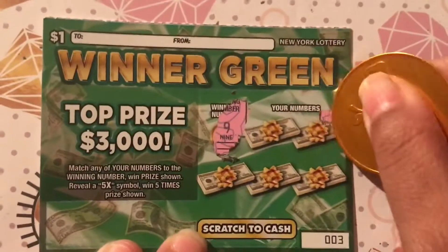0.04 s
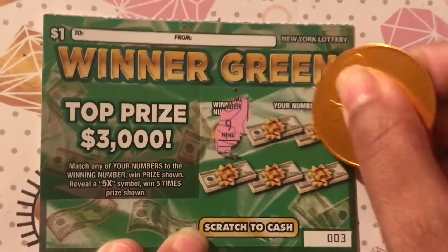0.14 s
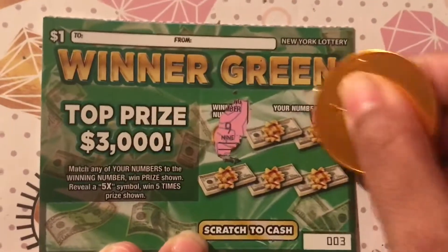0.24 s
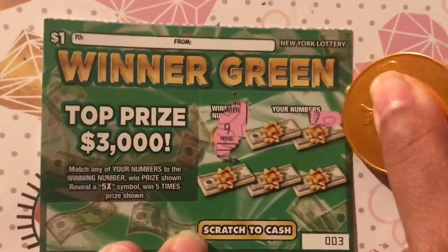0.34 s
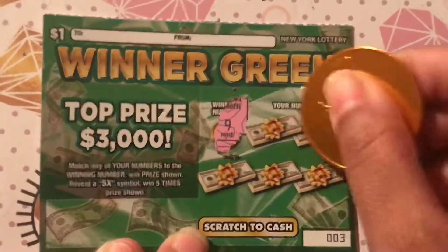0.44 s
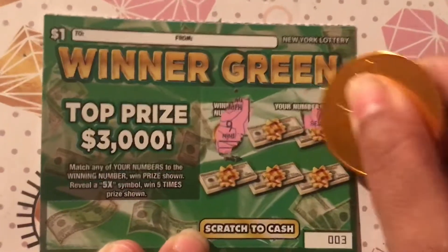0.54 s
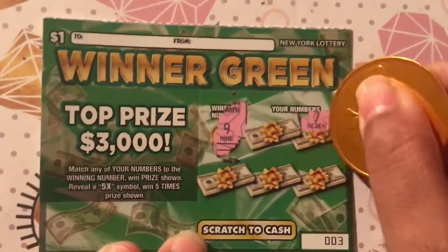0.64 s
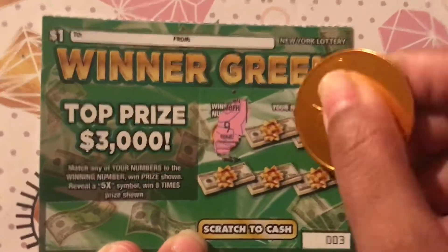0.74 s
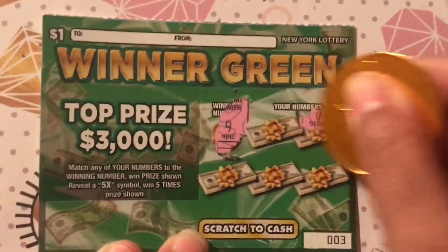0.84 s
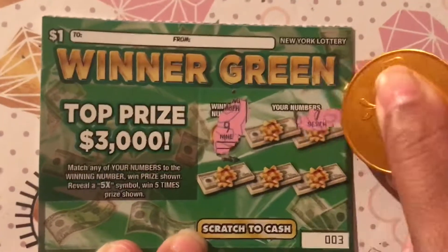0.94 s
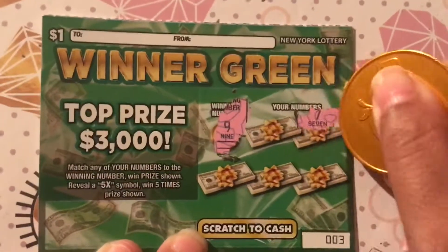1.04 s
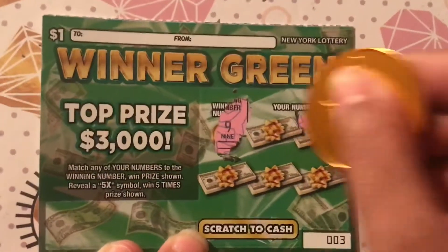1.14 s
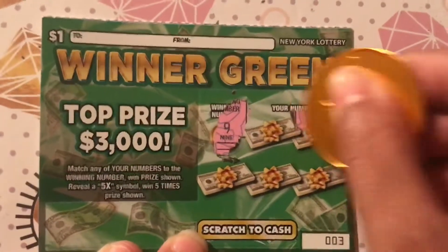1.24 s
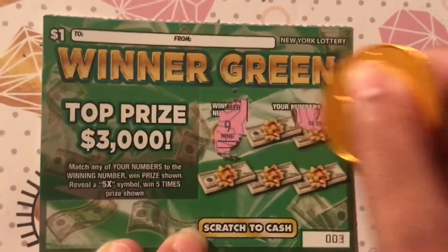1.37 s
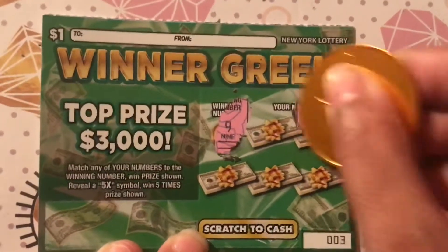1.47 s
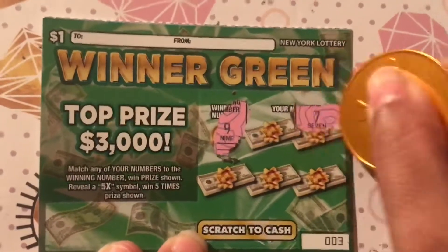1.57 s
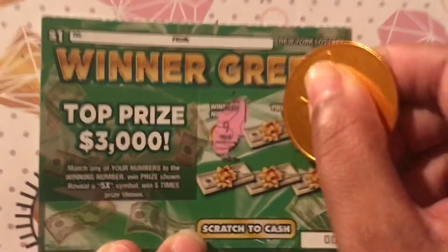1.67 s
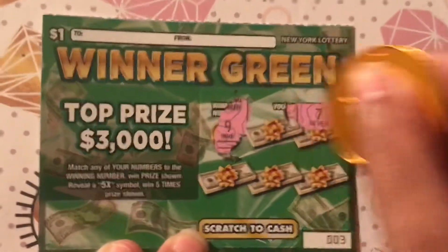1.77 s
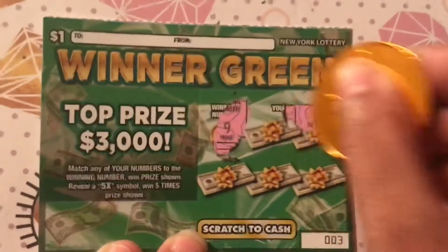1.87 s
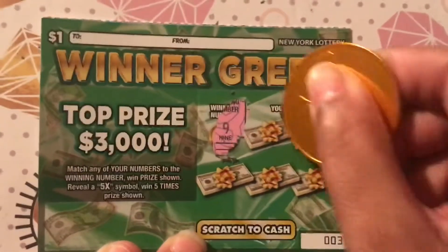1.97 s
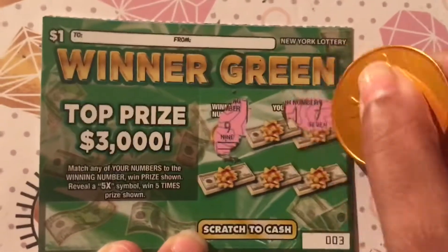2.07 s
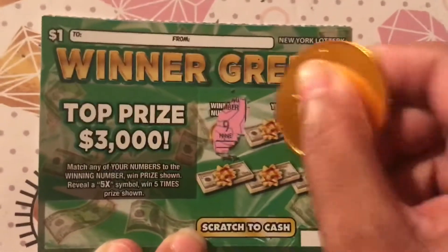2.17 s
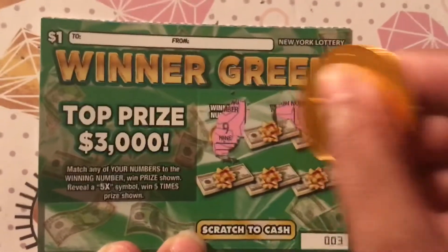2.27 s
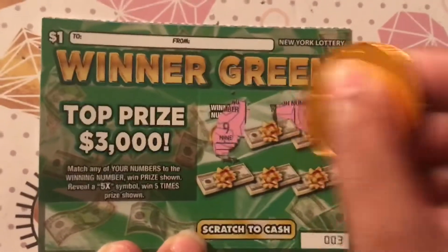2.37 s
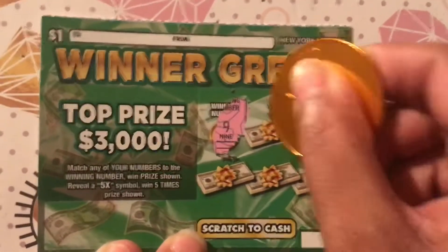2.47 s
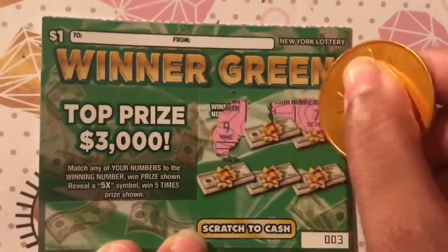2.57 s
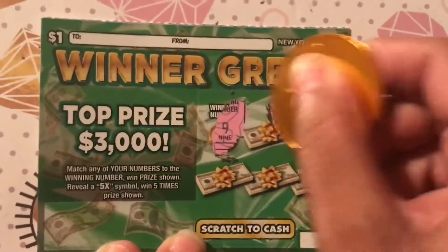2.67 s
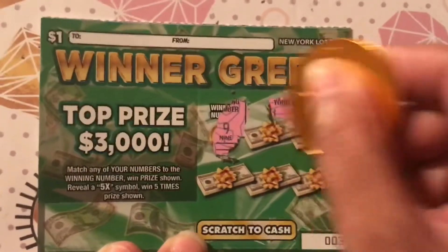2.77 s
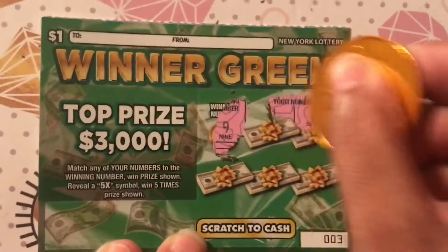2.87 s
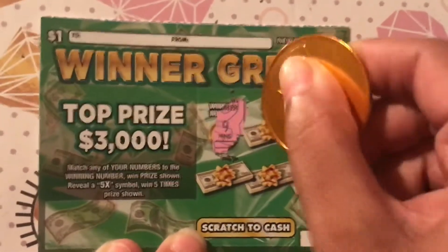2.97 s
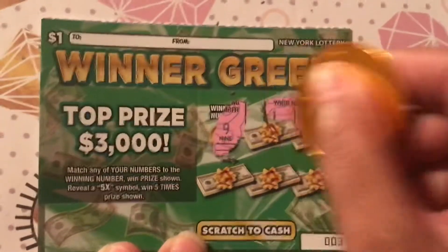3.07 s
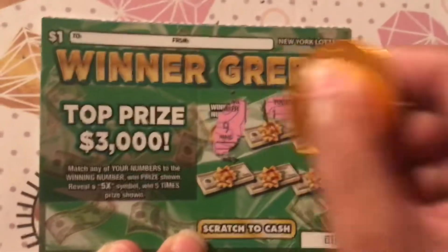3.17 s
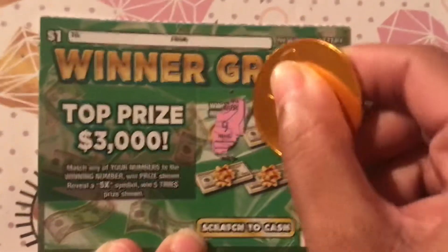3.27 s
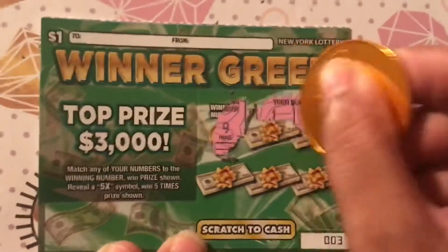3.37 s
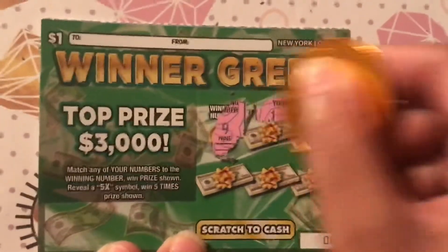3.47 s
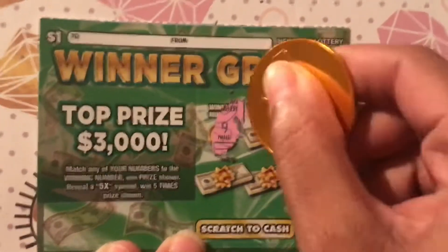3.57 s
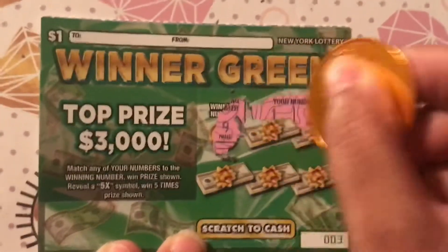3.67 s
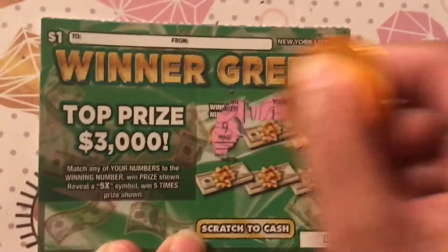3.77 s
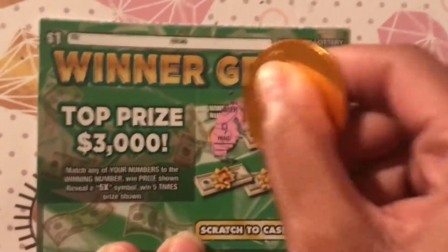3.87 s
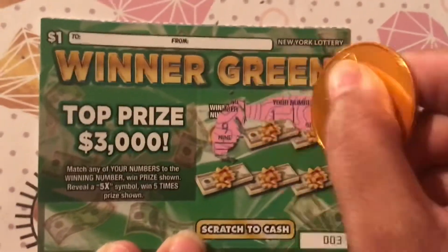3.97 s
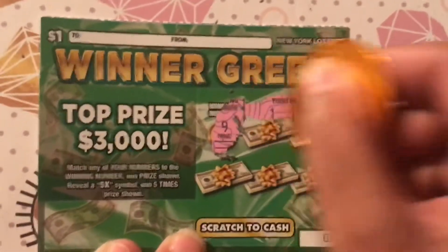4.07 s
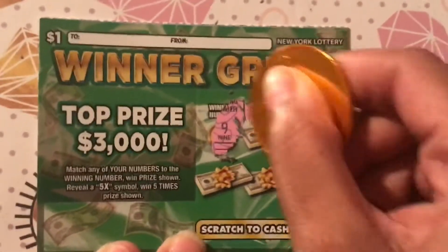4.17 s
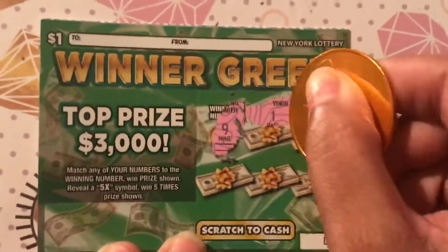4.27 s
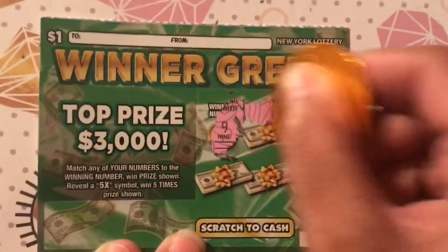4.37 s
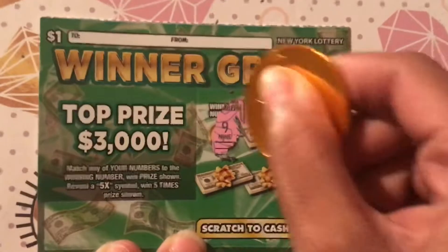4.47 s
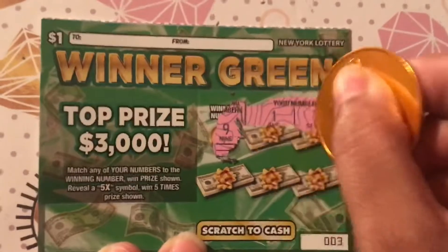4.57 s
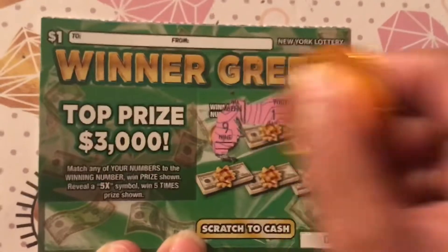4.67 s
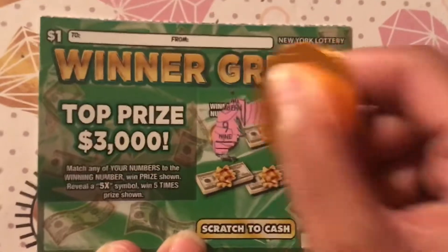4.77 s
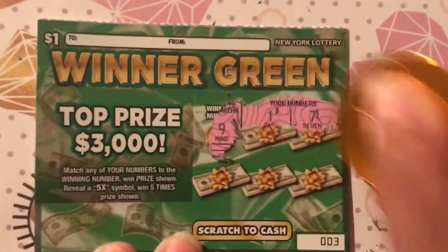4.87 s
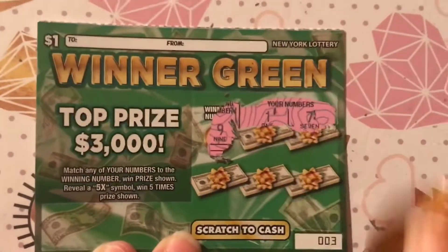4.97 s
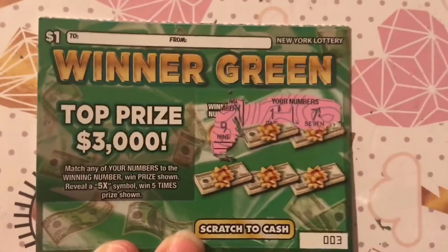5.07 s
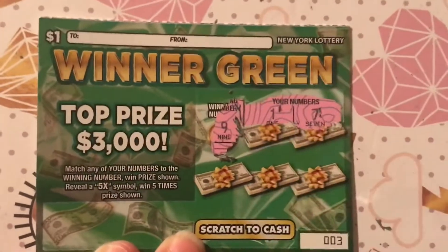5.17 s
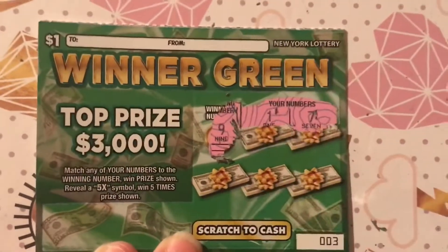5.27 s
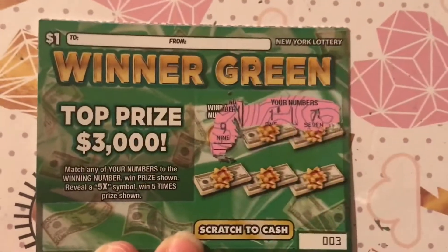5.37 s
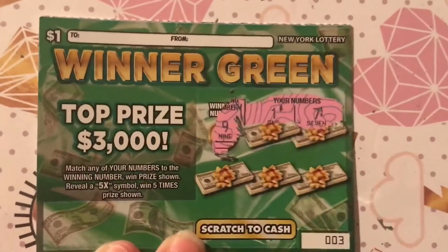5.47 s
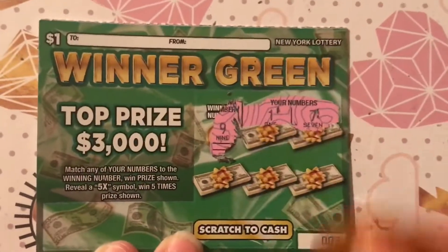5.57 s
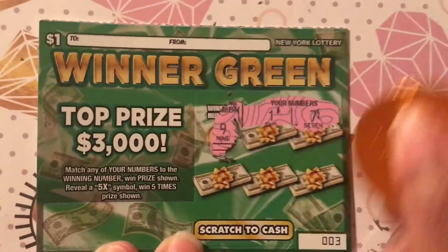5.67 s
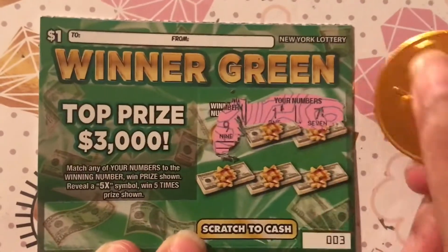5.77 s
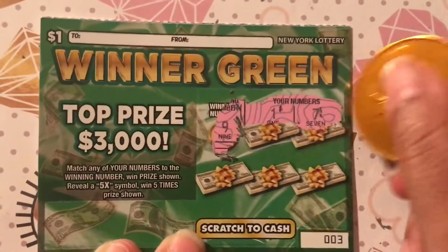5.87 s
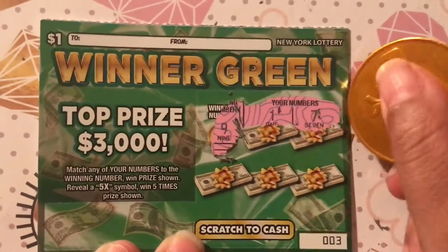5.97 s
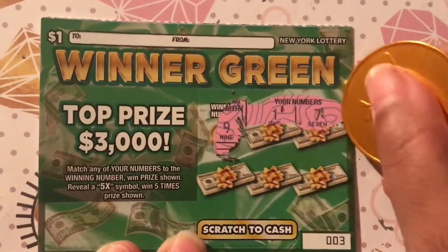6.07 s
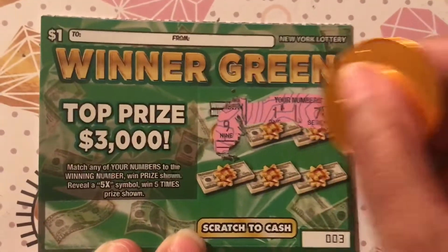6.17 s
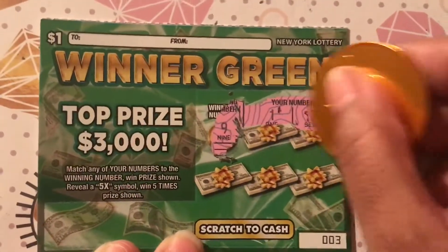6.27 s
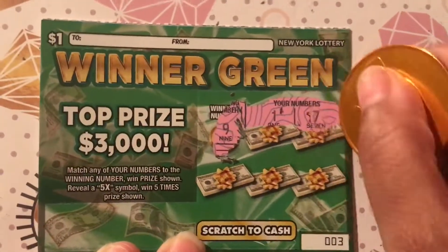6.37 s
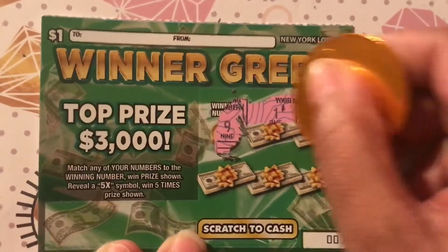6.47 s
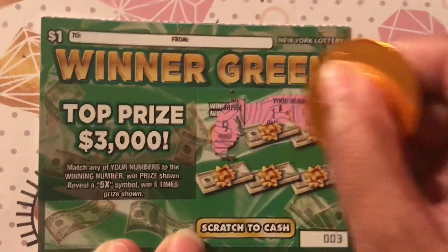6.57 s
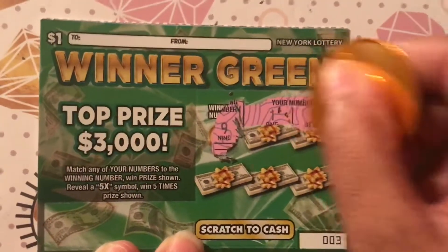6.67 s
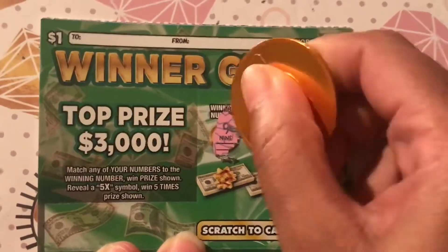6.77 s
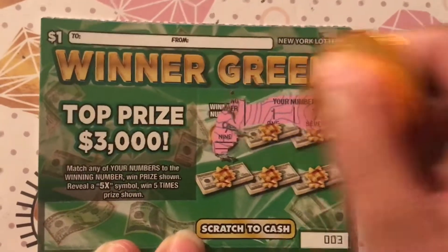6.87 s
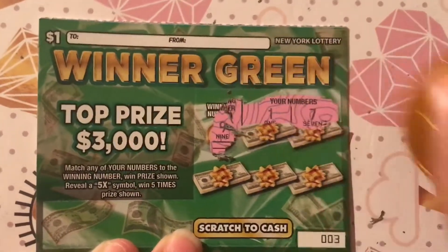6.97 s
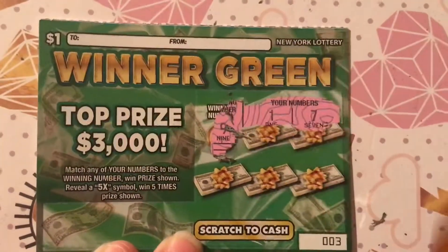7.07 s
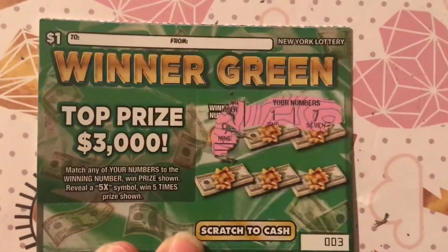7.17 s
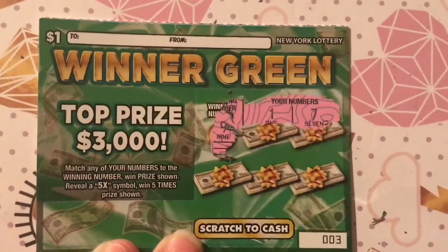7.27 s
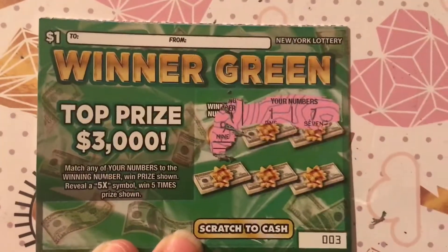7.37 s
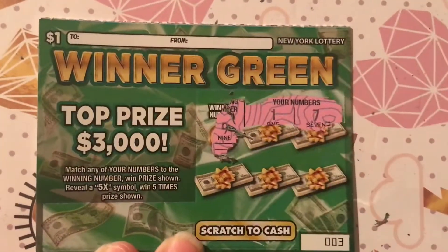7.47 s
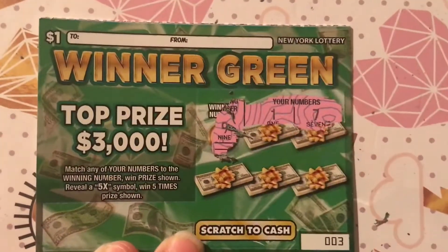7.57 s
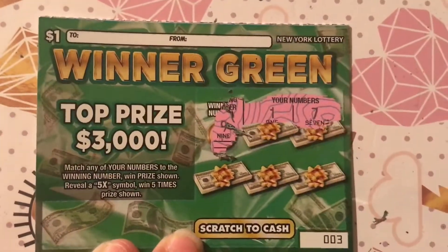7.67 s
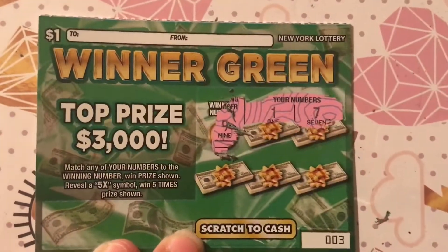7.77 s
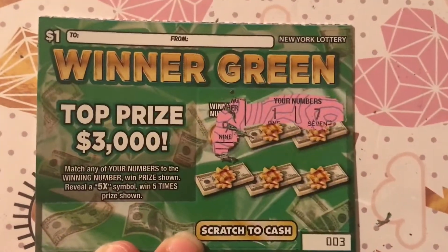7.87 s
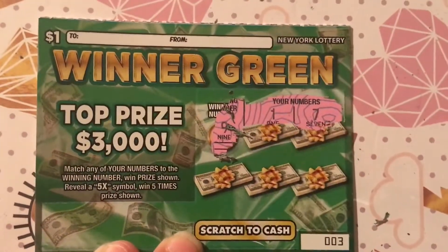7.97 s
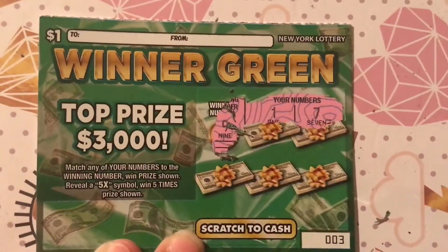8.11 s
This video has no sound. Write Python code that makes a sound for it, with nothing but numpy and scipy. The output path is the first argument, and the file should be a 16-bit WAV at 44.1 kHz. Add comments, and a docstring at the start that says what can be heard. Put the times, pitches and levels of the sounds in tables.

```python
"""In a quiet room, close by, a coin scrapes the coating off a paper ticket lying on a table.
Hard pushes alternate with light returns: tiny slips of the edge make the table top rasp at its own pitches,
while grains of flaking coating hiss and make the coin ring. Now and then the edge snags with a crackle
and a knock, and the hand bumps the table, which sways with a low thud. One flick bends the card until it
snaps free; in the pauses shaped noise brushes softly over the paper, above a faint room tone."""
import sys
import numpy as np
from scipy import signal
from scipy.fft import rfft, irfft, next_fast_len
from scipy.io import wavfile

SR = 44100
rng = np.random.default_rng(int(sys.argv[2]) if len(sys.argv) > 2 else 0)


def generate_wav(signal):
    """Clip the signal to [-1, 1] and save it as 16-bit WAV at the path in sys.argv[1]."""
    frames = np.transpose(np.atleast_2d(signal))
    scaled = np.clip(frames, -1, 1) * 32767
    pcm = np.round(scaled).astype(np.int16)
    wavfile.write(sys.argv[1], SR, pcm)


N = 358974

# The edge catches and breaks free:
# (time [s], crackle level [dB], level of the knock in the table [dB], length of the crackle [s])
SNAGS = [(0.053, -43.5, -43, 0.0075), (.086, -53, -38, 0.0093), (0.203, -41.5, -45.5, .01),
         (0.229, -42, -40.5, 0.011), (.367, -39, -35, 0.0093), (.666, -40.5, -35, 0.0032),
         (1.01, -41, -45.5, 0.0014), (1.089, -42, -30.5, 0.018), (1.199, -45, -54, 0.0018),
         (1.238, -43.5, -46, .015), (1.332, -45, -33, 0.0045), (1.552, -52, -37, .0024),
         (1.598, -42, -28.5, 0.0033), (2.108, -39, -30.5, 0.007), (2.358, -37.5, -32, .004),
         (2.876, -48, -34, 0.0056), (3.151, -41, -47, 0.0048), (3.441, -43, -55, 0.011),
         (3.455, -34.5, -32.5, .005), (3.748, -35.5, -46, 0.0055), (3.756, -30.5, -49, 0.0044),
         (4.067, -46, -39, .004), (4.355, -44, -37.5, 0.0092), (4.368, -42, -48, 0.0036),
         (4.78, -65, -52, .005), (6.066, -53, -56, 0.0011), (6.841, -35.5, -40, 0.012),
         (6.856, -42, -50, 0.0038)]
# The hand bumps the table: (time [s], level [dB], change of the scraping just after it [dB])
BUMPS = [(.076, -37, 5), (.26, -37.5, -12), (0.392, -41, -4.5), (.67, -35.5, -12.5), (1.099, -39, 5),
         (1.604, -35, -1), (2.115, -39, -6.5), (2.367, -38, -3.5), (2.88, -33, -6), (3.164, -37.5, -3.5),
         (3.464, -29.5, -10.5), (3.762, -26.5, -1), (4.011, -38, -1.5), (4.307, -33, -2),
         (6.295, -42.5, -2), (6.865, -47, 4)]


def from_db(db):
    """Turn decibels into a gain."""
    return 10 ** (np.asarray(db) / 20)


def rms_one(x):
    """Scale to unit power."""
    return x / np.sqrt(np.mean(x ** 2) + 1e-20)


def in_time(rows):
    """Join (time, value) rows by straight lines."""
    return np.interp(np.arange(N) / SR, *np.transpose(rows))


def colour(x, spectrum):
    """Shape by a smooth spectrum, keeping the power of a white input."""
    hz, db = np.transpose(spectrum)
    size = next_fast_len(N)
    bins_hz = np.maximum(np.fft.rfftfreq(size, 1 / SR), 1)
    gain = rms_one(from_db(np.interp(np.log(bins_hz), np.log(hz), db)))
    return irfft(rfft(x, size) * gain, size)[:N]


def band(x, low_hz, high_hz):
    """Keep one band of x, without delaying it."""
    sos = signal.butter(4, [low_hz, min(high_hz, SR * .45)], "band", fs=SR, output="sos")
    return signal.sosfiltfilt(sos, x)


def drift(rate):
    """Random curve of spread 1 that takes a new direction about rate times a second."""
    knots = np.arange(N) / SR * rate
    return rms_one(np.interp(knots, np.arange(N), rng.standard_normal(N)))


def resonate(x, hz, width_hz):
    """Ring at one pitch, with gain 1 at the top of the resonance."""
    r = np.exp(-np.pi * width_hz / SR)
    top = np.array([1, 0, -1]) * (1 - r * r) / 2
    bottom = [1, -2 * r * np.cos(2 * np.pi * hz / SR), r * r]
    return signal.lfilter(top, bottom, x + 1e-18)


def slips(per_s, spread_db):
    """Tiny random breaks of contact, of uneven size and either sign; unit power."""
    sizes = from_db(spread_db * np.minimum(rng.exponential(1, N), 4))
    signs = rng.choice([-1, 1], N)
    happens = rng.random(N) < per_s / SR
    return rms_one(sizes * signs * happens)


def arch(phase, crest):
    """Curve that rises from 0 to 1 at the crest and falls back to 0."""
    warped = np.interp(phase, [0, np.clip(crest, .1, .9), 1], [0, .5, 1])
    return np.sin(np.pi * warped).clip(0)


def hand(overrun_s=.006, rasp_power=0.75, swell_power=1.3, release_power=2.4, return_power=1.77, pace_power=0.26):
    """Speed up and slow down each stroke; give speed, pace, pushing (0 or 1), rasp and hiss gains, tone gains."""
    # strokes, push and return in turn:
    # (start [s], end [s], rasp level [dB], hiss level [dB], crest of the pressure [share of the stroke])
    strokes = [(.03, .115, -43.5, -57.5, 0.49), (.18, .275, -44, -50, 0.36), (.31, .41, -36.5, -45.5, .73),
               (.432, .565, -43.5, -52.5, 0.26), (.609, .7, -37.5, -51, 0.89),
               (.74, .825, -51.5, -62, 0.44), (1.047, 1.135, -42.5, -50, 0.59),
               (1.168, 1.275, -45.5, -56.5, 0.58), (1.285, 1.395, -38.5, -42, 0.5),
               (1.42, 1.51, -44.5, -54.5, .48), (1.528, 1.635, -35, -47.5, 0.77),
               (1.665, 1.765, -45.5, -52, 0.35), (1.778, 1.895, -37.5, -41, 0.61),
               (1.925, 2.025, -46.5, -55.5, .4), (2.047, 2.145, -36.5, -44, 0.81),
               (2.183, 2.285, -43.5, -55, 0.27), (2.3, 2.39, -38.5, -47.5, 0.56),
               (2.42, 2.525, -45.5, -58.5, 0.65), (2.545, 2.66, -39.5, -43, 0.55),
               (2.695, 2.787, -46, -58, .52), (2.81, 2.9, -38, -45.5, 0.82),
               (2.968, 3.07, -45.5, -51, 0.38), (3.09, 3.195, -38.5, -45.5, 0.73),
               (3.238, 3.345, -45, -50.5, .46), (3.39, 3.48, -35, -47, 0.89),
               (3.55, 3.645, -45.5, -51, 0.42), (3.688, 3.785, -38.5, -46.5, .67),
               (3.83, 3.938, -45, -51, 0.57), (3.992, 4.085, -31, -44, 0.67),
               (4.13, 4.225, -43, -43.5, 0.48), (4.295, 4.395, -35.5, -50.5, 0.44),
               (4.41, 4.535, -44, -49, 0.47), (4.588, 4.695, -34.5, -44.5, 0.55),
               (4.708, 4.755, -47.5, -58, 0.21), (6.075, 6.175, -52, -62.5, 0.73),
               (6.215, 6.3, -50.5, -57, 0.33), (6.342, 6.455, -44.5, -53.5, 0.57),
               (6.485, 6.575, -53.5, -58, 0.49), (6.598, 6.725, -44.5, -48.5, 0.74),
               (6.75, 6.87, -49.5, -52.5, 0.49)]
    # a push bites at once and rasps deep; a return is light and even:
    # (rise of the rasp over a stroke that crests midway [dB], low rasp [dB], top hiss [dB], relative pace)
    push_style = (-13.5, -1, -3.0, 1.0)
    return_style = (2, -5.5, 0, 1.19)
    # how briskly the hand works: (time [s], pace relative to usual)
    briskness = [(.4, 1.27), (1.2, 0.88), (1.8, 0.98), (2.15, 1.2), (2.6, 0.95), (3.6, 1.2), (4.1, 0.91),
                 (4.65, 1.25), (6.1, 0.84), (6.6, 1.14)]
    # the low rasp, fuller in the last burst: (time [s], level [dB])
    low_rasp = [(.1, 1), (.5, -1), (1.7, -2), (3.6, 1.5), (4.6, -2), (6.1, 7.5), (6.8, 4)]
    # the top hiss, dull on the first strokes of a fresh grip: (time [s], level [dB])
    top_hiss = [(.07, -32), (.3, -18), (.8, -10), (1.5, -7), (2.6, -4.5), (4.0, -4), (4.7, -4.5), (6.1, -8),
                (6.6, 0.5)]
    usual_stroke_s = 0.12
    # the rasp leans towards the crest of the pressure (dB of rise per share of the stroke)
    rasp_lean_db = 41
    # the harder the rasp against the hiss, the more the hiss spreads to its low and top ends (dB per dB)
    low_hiss_follows, top_hiss_follows = 0.47, 0.38

    speed, pace, pushing, rasp, hiss = np.zeros((5, N))
    bass_db, low_db, top_db = in_time(low_rasp), np.zeros(N), in_time(top_hiss)
    for k, (start, end, rasp_db, hiss_db, crest) in enumerate(strokes):
        span = np.arange(int((start - overrun_s) * SR), int((end + overrun_s) * SR))
        phase = np.linspace(0, 1, len(span))
        push = k % 2 == 0
        rise_db, stroke_bass_db, stroke_top_db, haste = push_style if push else return_style
        rise_db = rise_db + rasp_lean_db * (crest - .5)
        speed[span] = arch(phase, .39)
        pushing[span] = push
        # the coin always covers about the same distance, so shorter strokes are faster
        pace[span] = haste * min((usual_stroke_s / (end - start)) ** pace_power, 1.15)
        bass_db[span] += stroke_bass_db
        low_db[span] += low_hiss_follows * (rasp_db - hiss_db)
        top_db[span] += stroke_top_db + top_hiss_follows * (rasp_db - hiss_db)
        # friction levels off once the coin is under way
        friction = np.tanh(3.54 * speed[span] ** 2) ** rasp_power
        rasp[span] += from_db(rasp_db) * rms_one(friction * from_db(rise_db * phase))
        # a push digs in gradually and lets go quickly
        power = np.where(phase < crest, swell_power, release_power) if push else return_power
        hiss[span] += from_db(hiss_db) * rms_one(arch(phase, crest) ** power)
    tones = from_db(np.array([bass_db, low_db, top_db]))
    return speed, pace * in_time(briskness), pushing, rasp, hiss, tones


def after_bumps(hold_s=0.054, grab_s=0.0017):
    """Gain of the scraping, which turns softer or louder for a moment after each bump."""
    t, db = np.arange(SR // 10) / SR, np.zeros(N)
    for s, level_db, change_db in BUMPS:
        shape = (1 - np.exp(-t / grab_s)) / (1 + (t / hold_s) ** 6)
        db[round(s * SR) + np.arange(len(t))] += change_db * shape
    return from_db(db)


def judder(speed, slow_hz=330, fast_hz=930, unsteady=.16):
    """The edge sticks and slips half regularly, faster as the coin speeds up."""
    wobble = np.exp(unsteady * drift(450) + .1 * drift(7))
    hz = (slow_hz + (fast_hz - slow_hz) * speed ** 2) * wobble
    wave = np.sqrt(2) * np.sin(2 * np.pi * np.cumsum(hz) / SR)
    return wave * from_db(0.57 * drift(160))


def knocks(ring_s=0.01):
    """Each snag gives the table one sharp tug, whose energy rings out over a few milliseconds."""
    force = np.zeros(N)
    for s, crackle_db, knock_db, length in SNAGS:
        force[round((s + .001) * SR)] = from_db(knock_db) * np.sqrt(SR * ring_s)
    return signal.sosfilt(signal.butter(2, 1500, fs=SR, output="sos"), force)


def table_top(speed, pace, pushing, rasp, bass, slow_hz=380, fast_hz=1200, judder_db=-18, bass_edge_hz=450):
    """Slips shake the table's modes; a faster coin crosses the grain faster and reaches higher ones."""
    # modes of the table top under the card, rung no narrower than a twelfth of their pitch:
    # (pitch [Hz], width [Hz], relative level [dB])
    table_modes = [(57.6, 8.3, -6), (109.4, 25, -8.5), (175.5, 43, -5.5), (242.4, 42, -2), (390, 42, -4.5),
                   (522.3, 48.7, 0), (575, 61.5, 1), (693, 19, 0.5), (839, 18, -3), (944, 33, -3.5),
                   (1090, 114, -7.5), (1317, 62, -14), (1550, 290, -19), (1830, 250, -16.5)]
    friction = slips(4000, spread_db=2.0) * from_db(1.0 * drift(110))
    force = rasp * (friction + from_db(judder_db) * pushing * judder(speed))
    tugs = knocks()
    reach_hz = slow_hz + (fast_hz - slow_hz) * (pace * speed) ** 2
    out, power = 0, 0
    for k, (hz, width_hz, db) in enumerate(table_modes):
        # less force gets through above the reach of the coin
        drive = (fast_hz / reach_hz) ** .45 / np.sqrt(1 + (hz / reach_hz) ** 8)
        weight = bass if hz < bass_edge_hz else 1
        ring = resonate(force * drive * weight + tugs, hz, max(width_hz, hz / 12))
        # neighbouring modes take opposite signs
        out = out + (-1) ** k * from_db(db) * ring
        power += from_db(db) ** 2 * np.pi * width_hz / SR
    return out / np.sqrt(power)


def lingering(hiss, level_db=-27, fade_s=0.037):
    """Loose flakes keep crackling faintly under the resting coin after a stroke."""
    r = np.exp(-1 / (fade_s * SR))
    return hiss + from_db(level_db) * signal.lfilter([1 - r], [1, -r], hiss)


def snags(fade_s=0.00088):
    """Gain of the short burst of flakes that each snag tears off: it holds for its length, then fades."""
    crackle, t = np.zeros(N), np.arange(SR // 20) / SR
    for s, crackle_db, knock_db, length in SNAGS:
        burst = np.exp(-np.maximum(t - length, 0) / fade_s)
        crackle[round(s * SR) + np.arange(len(t))] += from_db(crackle_db) * burst
    return crackle


def coin_ring(edge):
    """The coin, damped by the fingers, rings at its own pitches when grains strike its edge."""
    # modes of the held coin: (pitch [Hz], width [Hz], relative level [dB])
    coin_modes = [(2550, 59, -3.5), (3220, 290, -5), (7080, 220, -1), (6780, 230, -1), (14150, 380, -16),
                  (14100, 450, -11)]
    # its strongest ring: (pitch [Hz], width [Hz])
    main_ring = [(9590, 270), (9810, 250)]
    main_ring_db = 6
    # two modes that depend on how loose the grip is: (pitch [Hz], width [Hz])
    loose_modes = [(4110, 280), (4330, 280)]
    # how freely those two ring: (time [s], level [dB])
    looseness = [(0, 5), (0.8, 4), (1.3, 2), (1.7, -1.5), (2.3, -18), (4.7, -3.5), (6.1, 7.5), (6.45, 2.5),
                 (6.9, -24)]
    ring = 0
    for hz, width_hz, db in coin_modes:
        ring = ring + from_db(db + 0.64 * drift(5.9)) * resonate(edge, hz, width_hz)
    for hz, width_hz in main_ring:
        ring = ring + from_db(main_ring_db + 1.8 * drift(15)) * resonate(edge, hz, width_hz)
    loose = band(edge, low_hz=3850, high_hz=4650) * from_db(in_time(looseness))
    for hz, width_hz in loose_modes:
        ring = ring + resonate(loose, hz, width_hz)
    return ring


def coating(pushing, hiss, low, top, crackle, card_db=-2, light_ring_db=-3, wander_db=2.5, snag_top_db=-4.0):
    """Flakes break off in dense grains; they hiss directly and ring the coin, more so under pressure."""
    # colour of the flaking coating: (frequency [Hz], relative level per Hz [dB])
    hiss_colour = [(500, 3), (1100, 11.5), (1700, 0), (2800, -0.5), (3700, -0.5), (4700, -3), (5600, -0.5),
                   (7400, -0.5), (8900, -7.5), (10400, -12), (11400, 3.5), (12700, 1), (14300, 9),
                   (16000, 2.5)]
    force = hiss * from_db(2.1 * drift(260) + 1.2 * drift(55)) + crackle
    edge = slips(13000, spread_db=3.0) * force * from_db(light_ring_db * (1 - pushing))
    card = colour(slips(13000, spread_db=3.0) * force, hiss_colour)
    # the card's own resonances come and go as the point of contact travels
    for hz in np.geomspace(1800, 13000, num=14):
        card = card + (from_db(wander_db * drift(11)) - 1) * resonate(card, hz, hz / 10)
    sound = from_db(card_db) * card + coin_ring(edge)
    # each stroke has its own tone; the snags all share one
    sliding = hiss / (hiss + crackle + 1e-9)
    low_gain = low ** sliding
    top_gain = top ** sliding * from_db(snag_top_db * (1.5 - sliding))
    lows = band(sound, low_hz=1100, high_hz=3500)
    tops = band(sound, low_hz=10500, high_hz=19000)
    return sound + (low_gain - 1) * lows + (top_gain - 1) * tops


def flick(swell_db_per_s=112, attack_s=0.0091, release_s=0.012):
    """The last flick bends the card, which rasps louder and louder until it snaps free."""
    # (start [s], snap [s], level at the snap [dB])
    start, snap, db = (6.772, 6.838, -45.5)
    # colour of the bent card: (frequency [Hz], relative level per Hz [dB])
    bent_card = [(500, -29.5), (1050, 8.5), (1500, -1), (2200, -6), (3200, -10), (4500, -35), (9000, -38)]
    gate = in_time([(start - attack_s, 0), (start, 1), (snap, 1), (snap + release_s, 0)])
    swell_db = swell_db_per_s * np.minimum(np.arange(N) / SR - snap, 0)
    return gate * from_db(db + swell_db) * colour(slips(5000, spread_db=-4.0), bent_card)


def bumps():
    """A soft blow sets the whole table swaying for a few cycles."""
    # the whole table swaying: (pitch [Hz], level [dB], time to fade by 60 dB [s])
    sway_modes = [(60.6, -3.5, 0.096), (101, 3, 0.045), (211, -4.5, 0.056)]
    t = np.arange(SR // 4) / SR
    sway = sum(from_db(db - 60 * t / t60) * np.sin(2 * np.pi * hz * t) for hz, db, t60 in sway_modes)
    out = np.zeros(N)
    for s, db, change_db in BUMPS:
        out[round(s * SR) + np.arange(len(t))] -= from_db(db) * sway
    return out


def swell(s, length, crest=0.36):
    """Gain of a light touch, which swells quickly and fades more slowly."""
    return arch((np.arange(N) / SR - s) / length + crest, crest) ** 1.5


def brushes(rustle_width=1.29):
    """Noise swells make broad, soft brushes over the paper and narrower rustles of the settling ticket."""
    # soft brushes over the paper: (time when loudest [s], length [s], level [dB])
    brush_touches = [(5.567, 0.25, -60), (7.35, .13, -72), (7.97, 0.12, -69)]
    # their colour: (frequency [Hz], relative level per Hz [dB])
    brush_colour = [(300, 3), (1200, -3), (2200, 1.5), (4000, 0), (6500, -5.5), (9000, 1), (11000, -8),
                    (13000, -1), (16000, 0.5)]
    # the released ticket settles: (time when loudest [s], length [s], level [dB], centre [Hz])
    rustles = [(4.881, .05, -71.5, 5900), (5.15, 0.27, -72.5, 450)]
    noise = rng.standard_normal(N)
    touch = sum(from_db(db) * swell(s, length) for s, length, db in brush_touches)
    out = touch * colour(noise, brush_colour)
    for s, length, db, hz in rustles:
        rustle = rms_one(band(noise, hz / max(rustle_width, 1.1), hz * rustle_width))
        out = out + from_db(db) * swell(s, length) * rustle
    return out


def room(x, t60=0.18, wet_db=-20, wall_hz=6500):
    """Add a faint, dull tail from the walls: fading noise with its treble softened."""
    t = np.arange(SR // 2) / SR
    tail = rng.standard_normal(len(t)) * from_db(-60 * t / t60) * (t > .005)
    dull = signal.butter(1, wall_hz, fs=SR, output="sos")
    tail = signal.sosfilt(dull, tail / np.linalg.norm(tail))
    return x + from_db(wet_db) * signal.fftconvolve(x, tail)[:N]


def room_tone(level_db=-61):
    """Steady noise, strongest in the bass: the quiet background of the room."""
    # (frequency [Hz], relative level per Hz [dB])
    tone_colour = [(20, -20), (42, 4.5), (65, 0.5), (110, -3), (180, -10), (260, -11.5), (320, -20),
                   (365, -13.5), (415, -23), (660, -20.5), (1300, -28), (4000, -31.5), (10000, -37.5),
                   (16000, -34.5)]
    return from_db(level_db) * colour(rng.standard_normal(N), tone_colour)


def scene():
    """Scraping, flick, bumps and brushes in the room, over the room tone."""
    speed, pace, pushing, rasp, hiss, (bass, low, top) = hand()
    bump_gain = after_bumps()
    scrape = table_top(speed, pace, pushing, rasp * bump_gain, bass)
    scrape = scrape + coating(pushing, lingering(hiss * bump_gain), low, top, snags())
    sources = scrape + flick() + bumps() + brushes()
    return (room(sources) + room_tone())[None]


def record(dry, low_cut_hz=42, cutoff_hz=15900):
    """A small microphone loses the deepest bass; the top is cut steeply."""
    thin = signal.sosfilt(signal.butter(3, low_cut_hz, "high", fs=SR, output="sos"), dry)
    return signal.sosfilt(signal.ellip(10, .1, 80, cutoff_hz, fs=SR, output="sos"), thin)


dry = scene()
out = record(dry)
generate_wav(out)
```